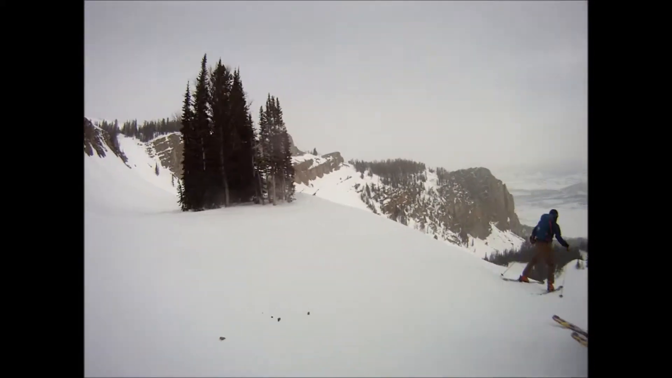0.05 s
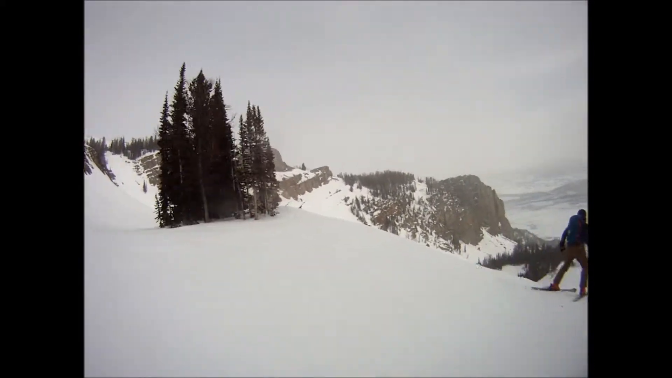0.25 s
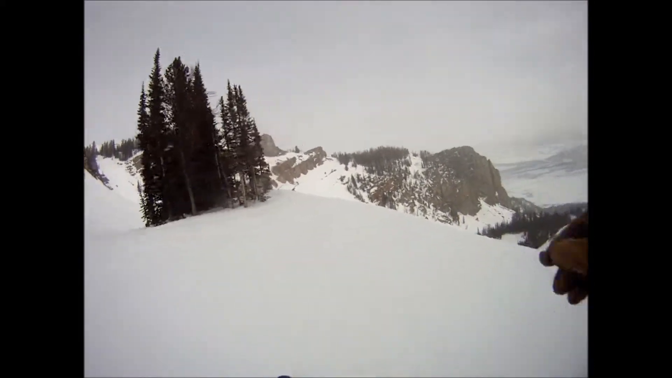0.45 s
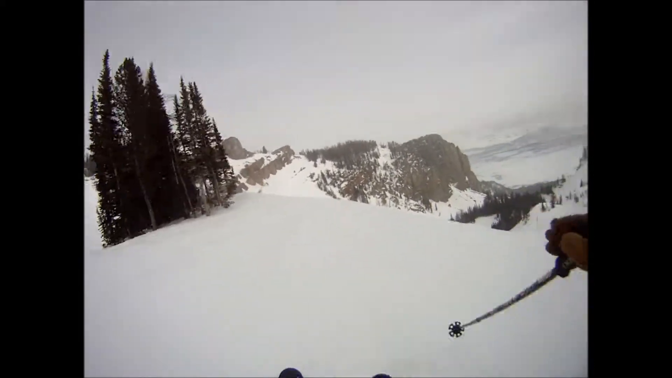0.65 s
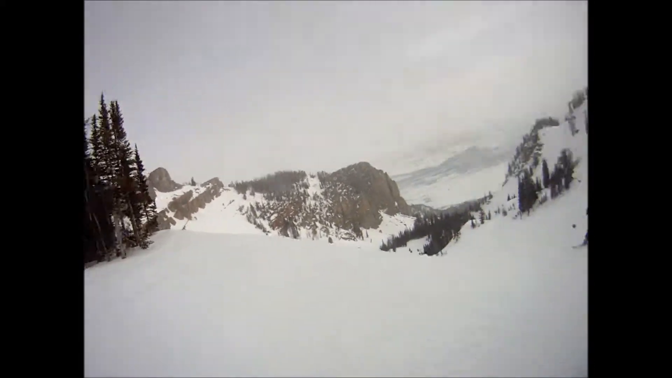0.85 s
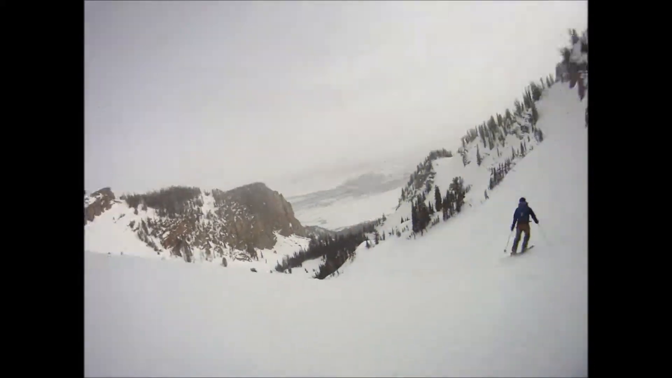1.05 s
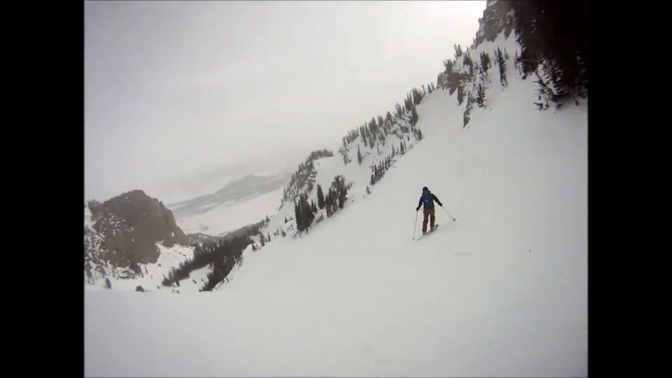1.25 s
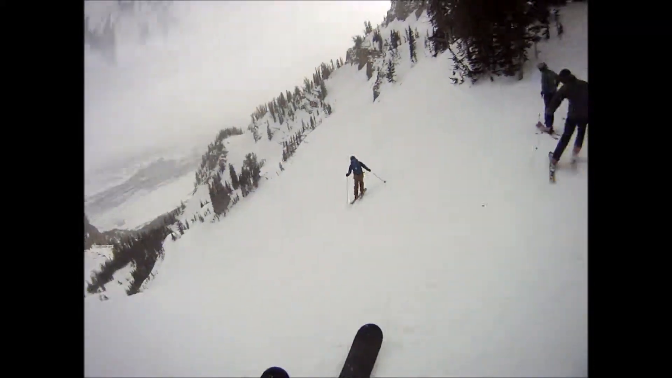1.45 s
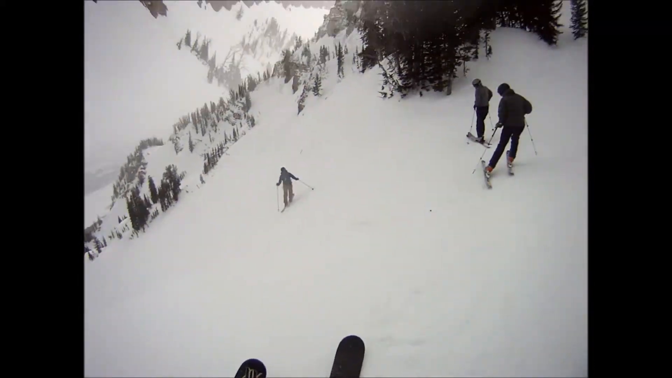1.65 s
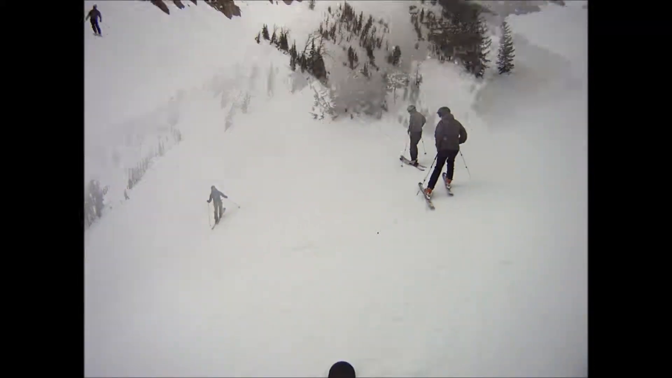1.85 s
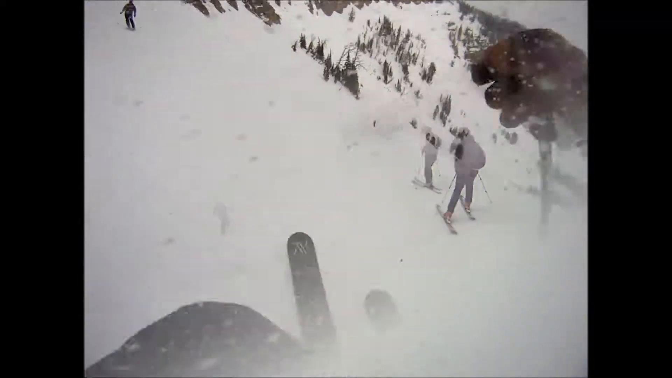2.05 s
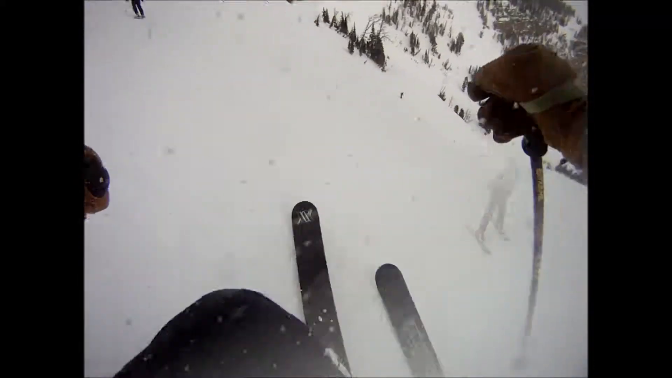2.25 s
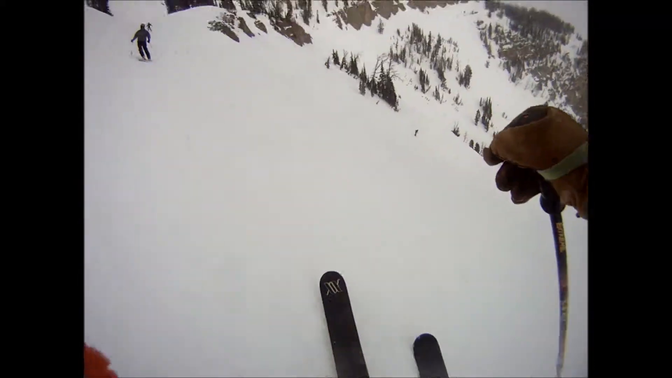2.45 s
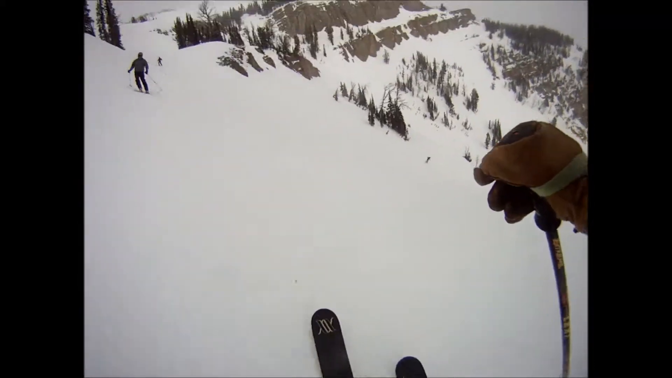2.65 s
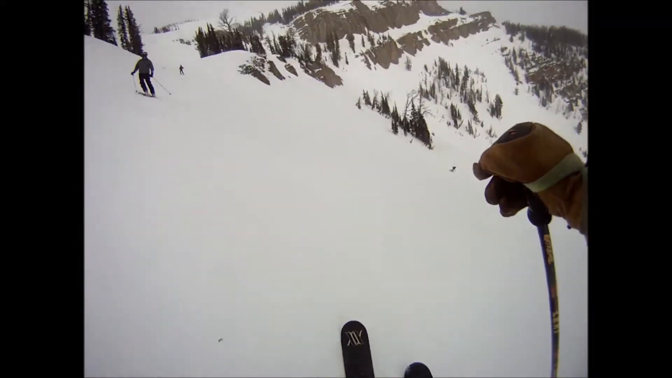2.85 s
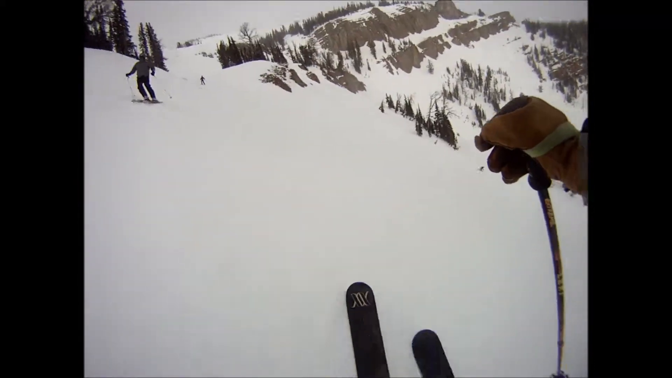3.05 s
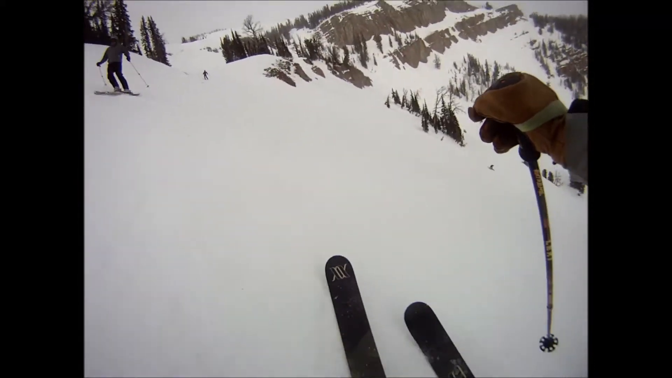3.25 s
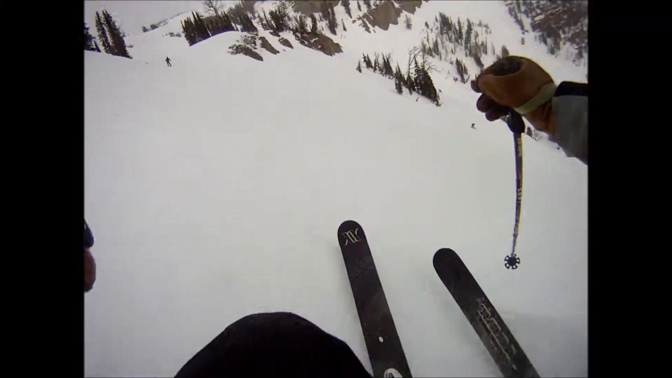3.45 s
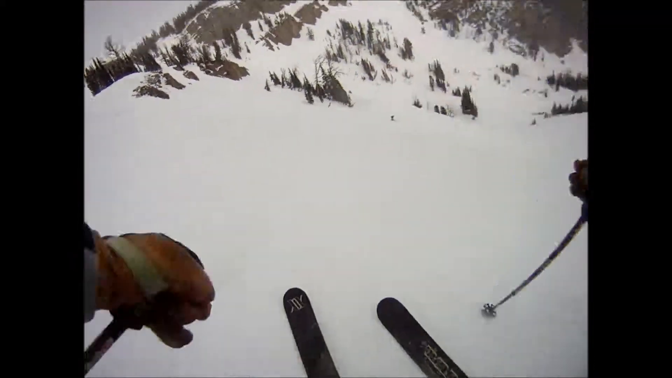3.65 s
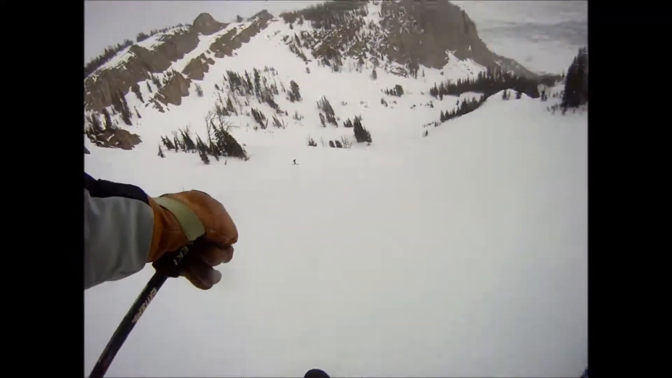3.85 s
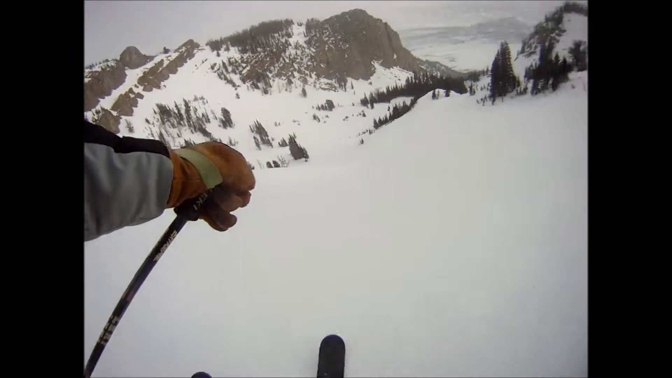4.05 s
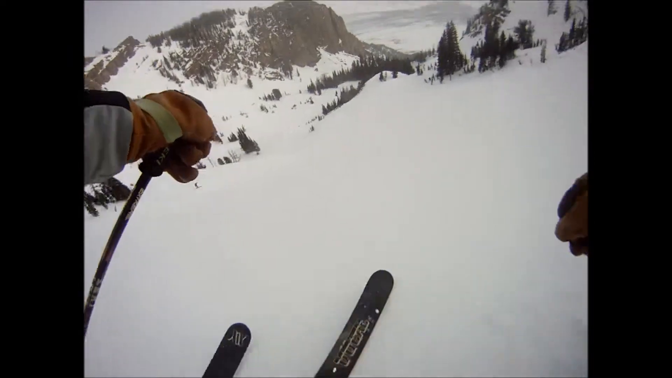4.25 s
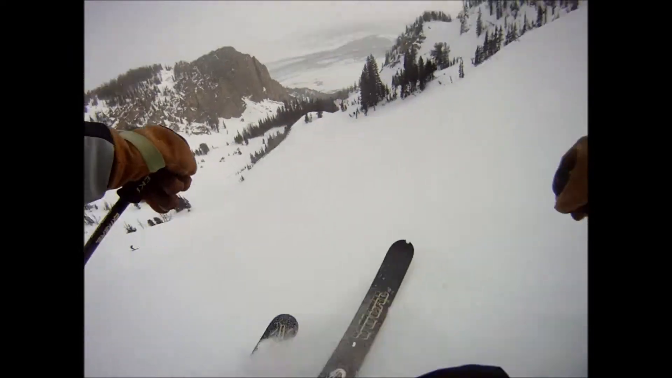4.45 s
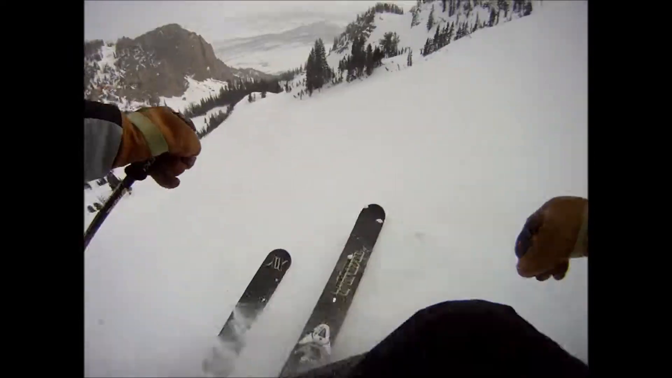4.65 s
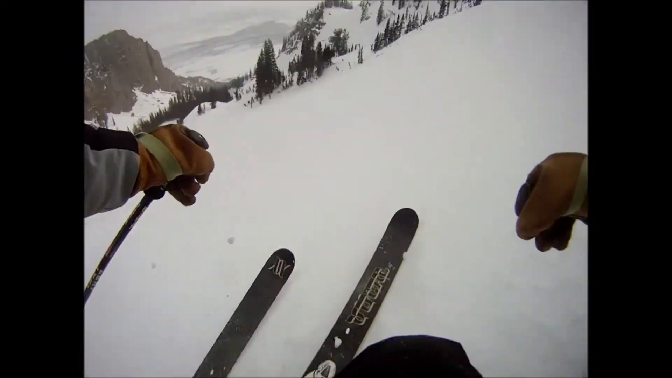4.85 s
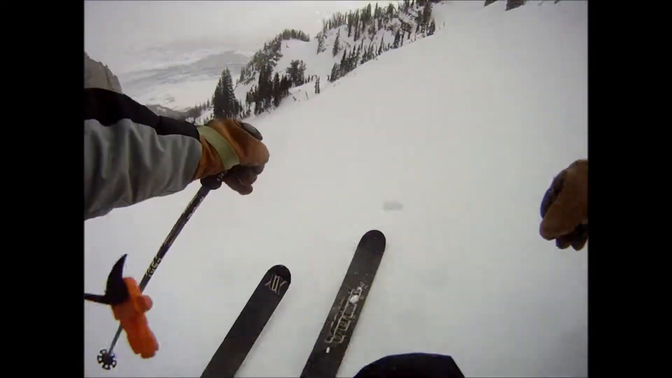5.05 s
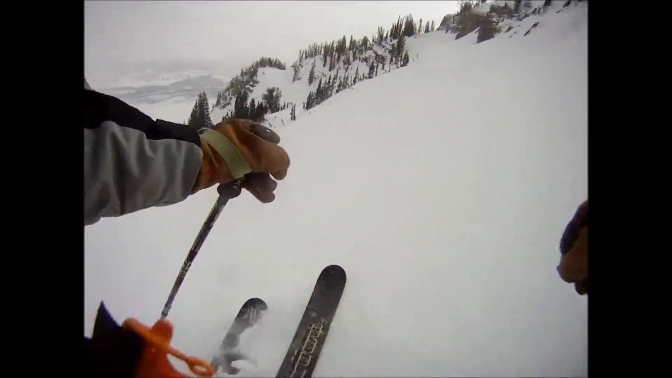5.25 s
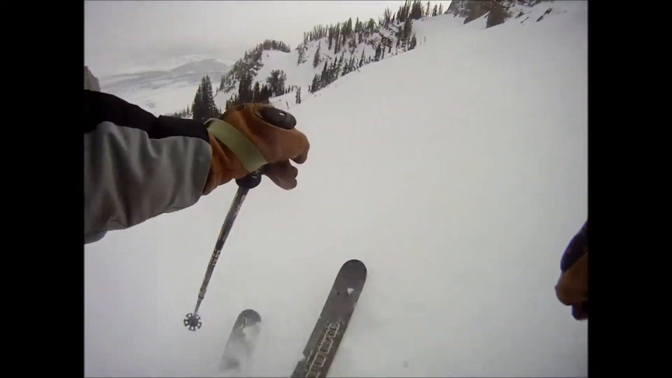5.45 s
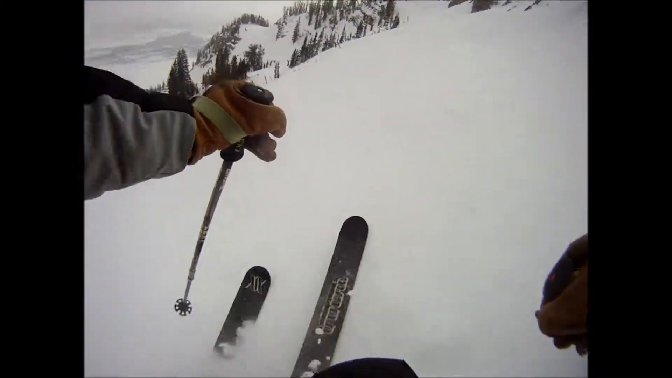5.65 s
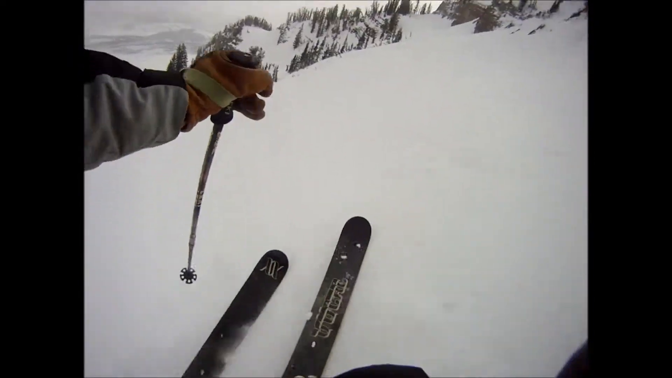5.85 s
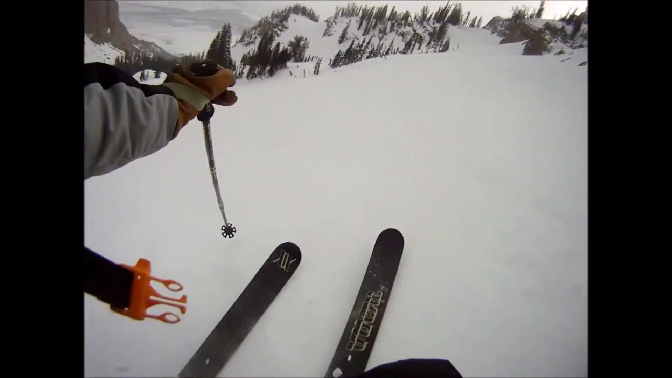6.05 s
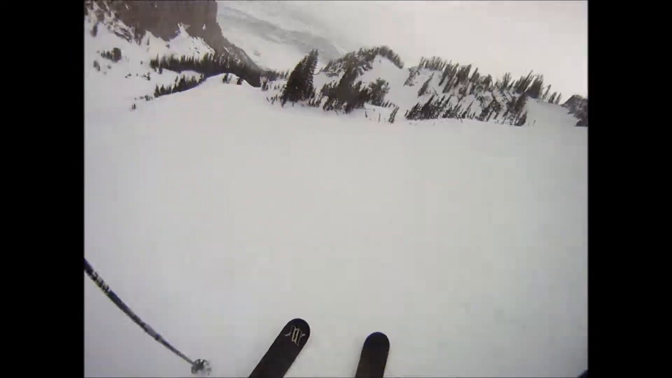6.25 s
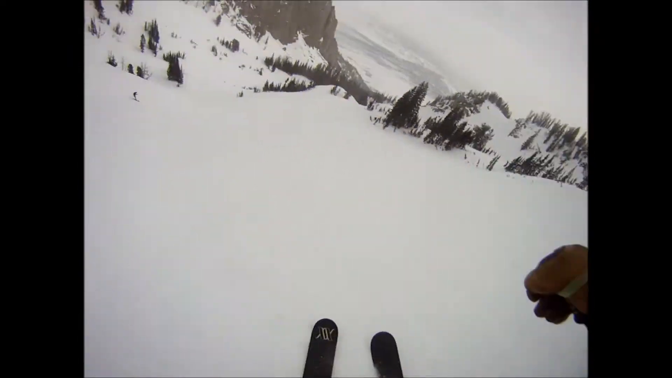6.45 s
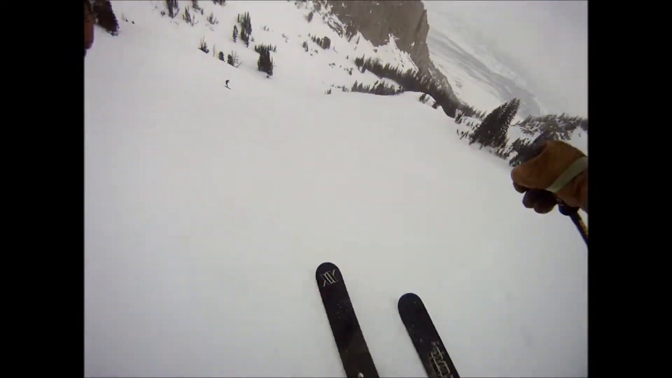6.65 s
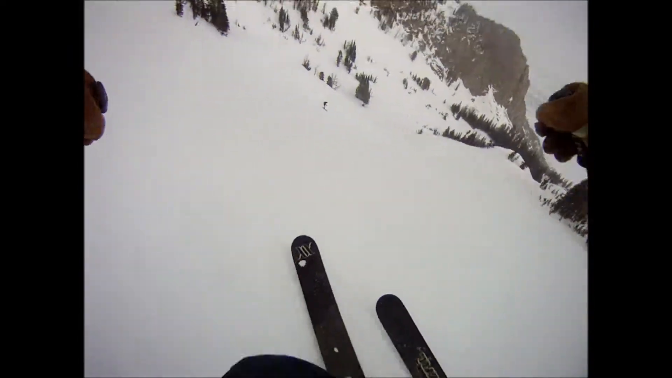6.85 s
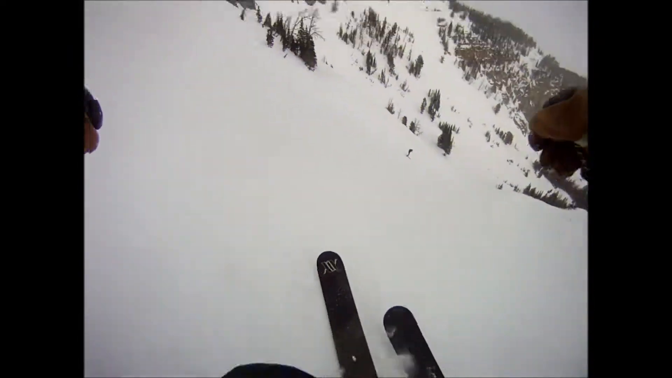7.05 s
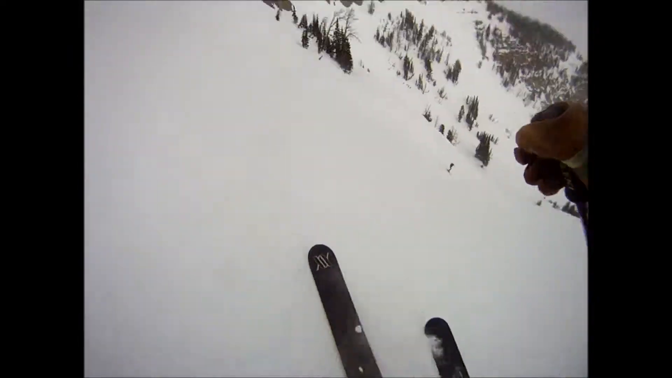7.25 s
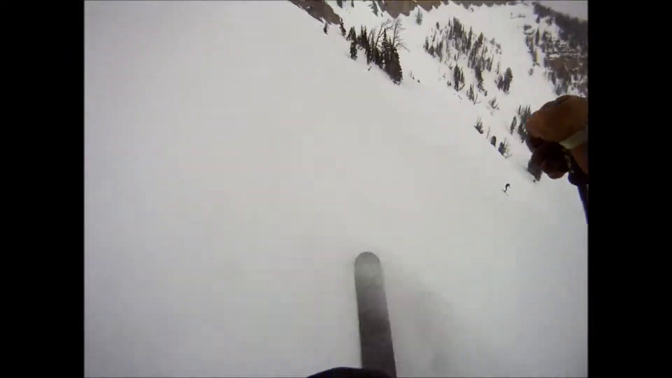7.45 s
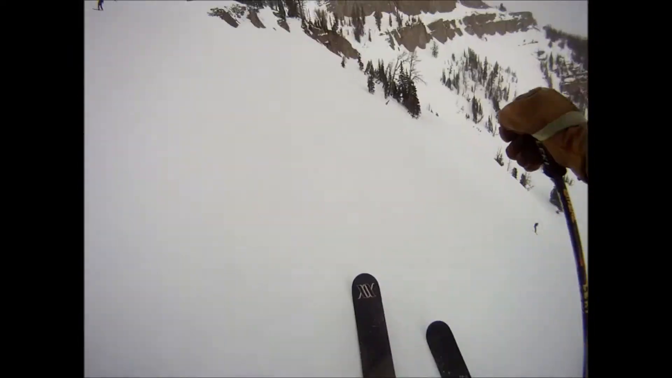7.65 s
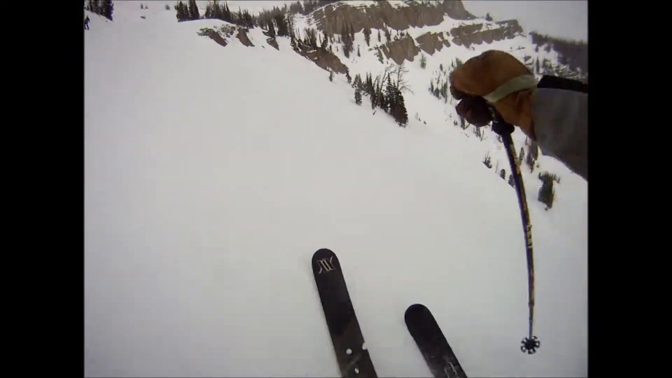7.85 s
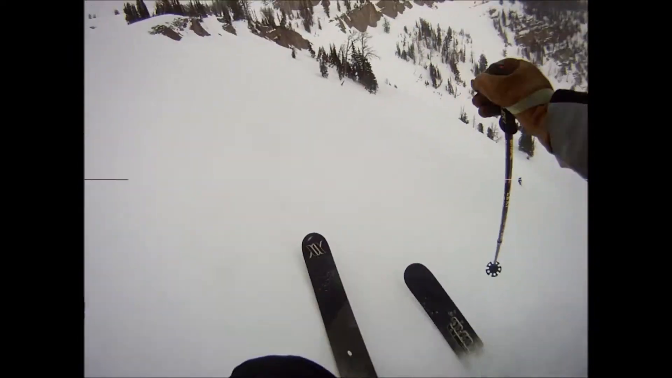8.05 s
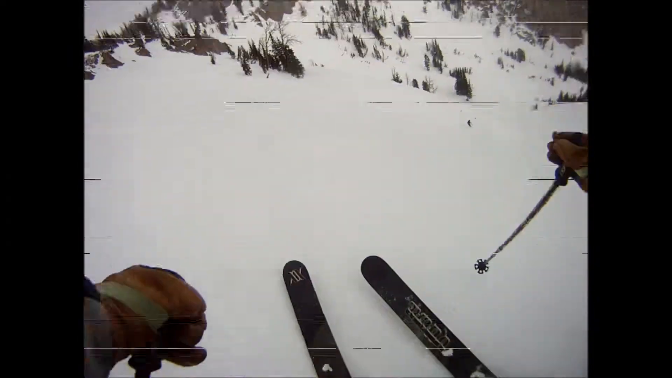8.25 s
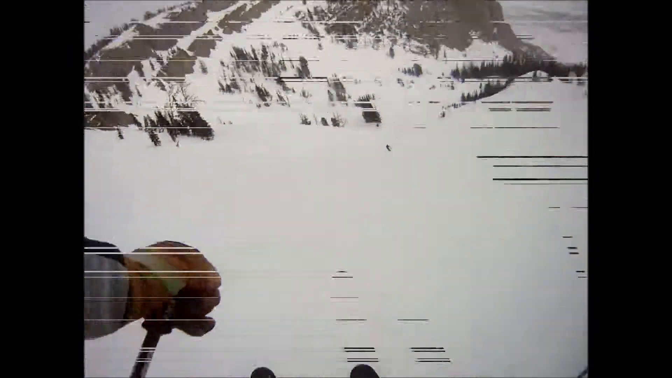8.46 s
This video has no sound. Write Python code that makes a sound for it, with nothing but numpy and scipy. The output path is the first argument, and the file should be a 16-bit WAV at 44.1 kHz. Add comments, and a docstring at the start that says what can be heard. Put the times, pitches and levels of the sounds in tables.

```python
"""Skis hiss through soft snow on a steep slope, swelling on each turn and breaking into crunches.
Snow crystals break under the base and the edges bite through crust. A small camera in a hard shell
rides on the skier: the shell colours the snow, wind buffets it, the mount thumps, gear ticks and
knocks, a strap creaks. The recorder holds each sample of a slow converter, so the sound is mirrored
around that rate. The sound drops out once, briefly."""
import sys
import numpy as np
from scipy import signal
from scipy.fft import rfft, irfft
from scipy.io import wavfile

SR = 44100
rng = np.random.default_rng(int(sys.argv[2]) if len(sys.argv) > 2 else 0)


def dump(signal):
    """Clip the signal to [-1, 1] and save it as 16-bit WAV at the path in sys.argv[1]."""
    limited = np.clip(np.atleast_2d(signal).T, -1, 1)
    pcm = np.round(limited * 32767).astype(np.int16)
    wavfile.write(sys.argv[1], SR, pcm)


N = 375732


# weight on the edges through the turns, as hiss level: time_s, level_db
EDGE_WEIGHT = [(0.0, -40), (0.3, -41), (0.6, -42), (1.05, -46), (1.15, -39.5), (1.45, -34.5), (1.8, -35),
               (2.05, -26), (2.45, -27.5), (2.7, -29.5), (3.2, -36.5), (3.5, -32.5), (3.8, -34),
               (4.05, -46.5), (4.25, -37), (4.5, -31.5), (4.88, -37.5), (4.99, -36), (5.05, -28),
               (5.3, -32.5), (5.55, -36), (6.2, -34.5), (6.42, -47.5), (6.53, -52.5), (6.72, -36.5),
               (6.85, -40), (6.9, -28.5), (7.12, -21.5), (7.3, -36), (7.7, -31.5), (8.52, -37)]
# edge bites through crust: start_s, level_db, length_ms
CRUNCHES = [(0.2, -36, 87), (0.7941, -41, 48), (0.8724, -34, 21), (1.365, -30, 32), (1.535, -24.5, 23),
            (1.8357, -25, 36), (1.915, -22.5, 24), (1.9664, -22, 36), (2.0425, -24.5, 16.5),
            (2.0994, -26, 16), (2.3344, -21.5, 16), (2.384, -23, 6.2), (2.428, -20.5, 20),
            (2.468, -15.5, 35), (2.4894, -32, 33), (2.5112, -29, 30), (2.532, -20.5, 27), (2.8903, -23, 22),
            (3.23, -34.5, 73), (3.365, -30.5, 59), (3.48, -27, 33), (3.55, -28.5, 43), (3.642, -22.5, 33),
            (3.675, -22, 62), (4.28, -26, 32), (4.312, -22, 118), (4.76, -27.5, 45), (5.008, -30, 41),
            (5.0294, -33, 23), (5.0898, -25, 47), (5.1484, -18, 38), (5.198, -21, 28), (5.226, -13, 15),
            (5.24, -20.5, 20), (5.325, -25.5, 102), (5.45, -27.5, 22), (6.0482, -48, 19), (6.7499, -27, 14),
            (6.8603, -25, 15), (6.904, -24.5, 44), (7.028, -23, 41), (7.1094, -37, 14), (7.149, -21, 22),
            (7.4634, -32, 14), (7.7313, -28, 16), (8.2921, -26, 20)]
# upper modes and spray against the shell ring: time_s, level_db
TREBLE_TILT = [(0.0, 2.5), (0.7, 0), (1.25, 0.5), (1.7, -3.5), (2.1, 0), (2.6, 0), (3.1, 2), (3.45, 0.5),
               (3.9, -2), (4.38, 2.5), (4.65, -1.5), (5.05, 0.5), (5.22, -1.5), (5.5, -0.5), (5.8, 0.5),
               (6.2, -2), (6.75, 1), (7.05, -1.5), (7.35, 1.5), (8.52, -1.5)]
# main shell cavity modes: pitch_hz, width_hz, level_db
SHELL_MODES = [(1505, 133, -8.5), (1951, 220, -0.5), (2244, 206, -0.5)]
# upper cavity modes: pitch_hz, width_hz, level_db
UPPER_MODES = [(2765, 194, -3.5), (3224, 263, -1.5), (3510, 133, 1), (4070, 440, -8)]
# fine spray: pitch_hz, width_hz, level_db
SPRAY_BANDS = [(3760, 1300, -15), (4620, 490, 9), (5585, 600, 3)]
# low cavity modes: pitch_hz, width_hz, level_db
BITE_MODES = [(370, 173, -14.5), (681, 132, -8.5), (1078, 136, -0.5)]
UPPER_DB, SPRAY_DB, BITE_DB = -2.5, -13.5, -9   # at mean weight
UPPER_SLOPE, SPRAY_SLOPE, BITE_SLOPE = 0.027, -0.038, -0.34   # dB per dB of weight
LUMPS_DB, COLOUR_WANDER_DB = 0.7, 0.8


def skis():
    """The base rides over lumps and crust, so all bands surge together; more weight thins the low bite."""
    hiss_db = curve(EDGE_WEIGHT)
    glide = from_db(hiss_db + LUMPS_DB * drift(7.3))
    load = np.hypot(glide, bursts(CRUNCHES, rise_share=0.096))
    weight_db = 20 * np.log10(load) - hiss_db.mean()
    flutter = from_db(1.28 * drift(43.0) + 0.75 * drift(70.0))
    snow = crystals(per_s=4000.0, spread_db=2.5, slide_gain=0.99)
    treble_db = curve(TREBLE_TILT)
    upper_db = UPPER_DB + treble_db + UPPER_SLOPE * weight_db + COLOUR_WANDER_DB * drift(3.5)
    spray_db = SPRAY_DB + treble_db + SPRAY_SLOPE * weight_db + COLOUR_WANDER_DB * drift(5.0)
    bite_db = BITE_DB + BITE_SLOPE * weight_db + COLOUR_WANDER_DB * drift(3.6)
    upper = from_db(upper_db) * resonances(snow, UPPER_MODES, flicker_db=1.9)
    spray = from_db(spray_db) * resonances(snow, SPRAY_BANDS, flicker_db=3.5)
    bite = from_db(bite_db) * resonances(snow, BITE_MODES, flicker_db=3.0)
    shell = resonances(snow, SHELL_MODES, flicker_db=1.68)
    return load * flutter * (shell - upper - spray - bite)


def crystals(per_s, spread_db, slide_gain):
    """Snow crystals break at random with uneven size, over smooth sliding noise."""
    sizes = from_db(spread_db * np.minimum(rng.exponential(1, N), 5))
    signs = rng.choice([-1, 1], N)
    breaks = rng.random(N) < per_s / SR
    return rms_one(sizes * signs * breaks) + slide_gain * rng.standard_normal(N)


# steady buffeting on the shell: time_s, level_db
WIND_LEVEL = [(0.0, -51), (0.9, -50), (1.3, -39.5), (1.75, -43), (2.1, -34.5), (2.5, -43), (3.0, -49.5),
              (3.6, -46.5), (4.4, -43), (4.75, -45), (5.0, -42.5), (5.5, -45.5), (6.15, -52.5),
              (6.5, -45.5), (7.1, -43), (7.6, -42.5), (8.52, -38.5)]
# gusts: start_s, level_db, length_ms
GUSTS = [(0.26, -43, 150), (1.36, -34.5, 170), (1.85, -20.5, 97), (2.07, -34, 120), (2.22, -32.5, 164),
         (3.59, -39, 150), (4.61, -23, 74), (4.7, -34, 170), (5.05, -27.5, 136), (5.28, -33.5, 145),
         (6.34, -38, 50), (7.22, -26.5, 90), (7.43, -31.5, 130), (7.62, -32.5, 91), (7.88, -33.5, 86),
         (8.07, -47, 89), (8.26, -32, 66)]
# buffeting spectrum: frequency_hz, density_db
WIND_SPECTRUM = [(8.8, -25), (15, 8.5), (97, -5.5), (146, -3), (262, -18), (327, -13.5), (432, -25),
                 (500, -20.5), (650, -30), (1100, -120)]


def wind():
    """Low, lumpy pressure noise at the microphone port, steady with gusts on top."""
    hz, density_db = np.transpose(WIND_SPECTRUM)
    bins_hz = np.fft.rfftfreq(N, 1 / SR)
    shape = from_db(np.interp(np.log(bins_hz + 1), np.log(hz), density_db))
    rumble = rms_one(irfft(rfft(rng.standard_normal(N)) * shape, N))
    lumps = from_db(2.5 * drift(30.0))
    strength = np.hypot(from_db(curve(WIND_LEVEL)), bursts(GUSTS, rise_share=0.14))
    return strength * lumps * rumble


# body jolts through the mount: start_s, level_db, pitch_hz
JOLTS = [(1.848, -20, 140), (1.877, -1, 172), (1.896, -15.5, 105), (1.912, -7.5, 70.5), (2.251, -15, 171),
         (2.269, -13.5, 128), (2.41, -25, 134), (4.62, -7.5, 176), (4.637, -21, 115), (4.683, -14, 103),
         (4.724, -20, 74), (4.819, -26, 146), (4.856, -27, 72.7), (5.118, -32, 119), (5.327, -21.5, 86),
         (7.24, -12, 134), (7.267, -13.5, 123), (7.279, -9.5, 133), (7.319, -25.5, 72.7), (7.449, -25, 141),
         (7.499, -20.5, 137), (8.099, -22.5, 124), (8.298, -16.5, 98), (8.333, -14, 174)]
# mount shudder: pitch_hz, width_hz, level_db
MOUNT_MODES = [(270, 140, 0), (400, 120, -4), (700, 300, -4)]
JOLT_RISE_S, JOLT_DECAY_CYCLES, SHUDDER_DB = 0.00079, 1, -10.5


def mount_thumps():
    """The mount swings back, then forward, and settles in a few cycles with a rough shudder."""
    span = 4000
    t = np.arange(span) / SR
    swing, shake = np.zeros((2, N + span))
    for start_s, level_db, hz in JOLTS:
        fade = from_db(level_db) * (1 - np.exp(-t / JOLT_RISE_S)) * np.exp(-t * hz / JOLT_DECAY_CYCLES)
        swing[round(start_s * SR):][:span] -= np.sin(2 * np.pi * hz * t) * fade
        shake[round(start_s * SR):][:span] += from_db(SHUDDER_DB) * fade
    shudder = resonances(rng.standard_normal(N), MOUNT_MODES, flicker_db=1.5)
    return swing[:N] + shake[:N] * shudder


# gear contacts, hardness as pitch above the shell ring: start_s, level_db, hardness_oct
CONTACTS = [(0.4923, -25.5, 0.93), (0.5734, -14, 0.42), (0.5802, -14.5, 0.0), (0.658, -22, 0.52),
            (1.0809, -23.5, 0.25), (1.138, -21.5, 1), (1.38, -16, -0.36), (1.5424, -17.5, 1.25),
            (1.549, -17, 1.2), (1.702, -20, 0.0), (1.7658, -26, -0.0054), (1.878, -3, -0.68),
            (1.898, -25, -1.05), (1.9161, -11, 0.27), (2.2599, -17, -0.78), (2.8984, -11, 1.54),
            (2.9044, -9, 1.77), (3.321, -22.5, 1.1), (3.3732, -16.5, -0.57), (3.422, -14, 0.23),
            (3.4937, -19, 0.25), (3.9447, -23, 0.0), (4.098, -22.5, -0.76), (4.111, -30, -0.8),
            (4.1372, -25.5, 1.2), (4.623, -4, -0.5), (4.6838, -27, -1.4), (4.7474, -18, 1.2),
            (5.043, -18.5, -1.0), (6.0306, -8, -0.53), (6.1046, -4.5, -0.5), (6.4594, -26.5, 0.63),
            (6.507, -28, 0.37), (6.75, -13, 1.52), (6.7568, -15, 0.4), (7.27, -18, 1.5), (7.28, -20, -1.0),
            (7.4113, -13, 0.66), (7.4138, -18, 0.58), (8.013, -17, -0.59), (8.153, -17.5, 1.05),
            (8.2224, -25.5, 1.35), (8.297, -15.5, 0.0), (8.333, -25, -1.0), (8.3804, -14, 1.08),
            (8.505, -21, 0.96)]
# modes a contact strikes, shell ring first: pitch_hz, ring_s
TICK_MODES = [(2043, 0.016), (994, 0.0059), (3380, 0.0047), (4790, 0.0081)]
RATTLE_S, RATTLE_GROWTH_PER_OCT, FALL_DB_PER_OCT2 = 0.0024, 1.26, 32.5


def gear_ticks():
    """A sharp contact and its rattle, longer when harder; modes far from its hardness ring less."""
    span = 900
    out = np.zeros(N + span)
    shell_hz = TICK_MODES[0][0]
    rattle_s = RATTLE_S * RATTLE_GROWTH_PER_OCT ** np.array(CONTACTS)[:, 2:]
    force = 0.31 * rng.standard_normal((len(CONTACTS), span)) * np.exp(-np.arange(span) / SR / rattle_s)
    force[:, 0] = 1   # first impact
    for hz, ring_s in TICK_MODES:
        for (start_s, level_db, hardness_oct), tick in zip(CONTACTS, ring(force, hz, ring_s)):
            away_oct = np.log2(hz / shell_hz) - hardness_oct
            peak = from_db(level_db - FALL_DB_PER_OCT2 * away_oct ** 2)
            out[round(start_s * SR):][:span] += peak * tick / np.abs(tick).max()
    return out[:N]


# strap slips: start_s, level_db
SLIPS = [(0.731, -47), (0.742, -39), (0.75, -32), (0.762, -34), (0.776, -29.5), (0.794, -34), (5.366, -26),
         (5.376, -31), (5.383, -23), (5.39, -20), (5.397, -23), (5.409, -18.5)]


def strap_creaks():
    """The strap creaks in separate slips, each one click into two low modes of the shell."""
    clicks = np.full(N, 1e-18)
    for start_s, level_db in SLIPS:
        clicks[round(start_s * SR)] = from_db(level_db)
    low = from_db(5.5) * ring(clicks, hz=940, ring_s=0.0058)
    high = from_db(0.5) * ring(clicks, hz=1820, ring_s=0.017)
    return low + high


def resonances(x, modes, flicker_db):
    """Parallel resonances of alternating sign, each flickering on its own; rms 1."""
    out = 0
    for k, (hz, width_hz, level_db) in enumerate(modes):
        r, w = np.exp(-np.pi * width_hz / SR), 2 * np.pi * hz / SR
        gain = (1 - r * r) / 2
        band = signal.lfilter([gain, 0, -gain], [1, -2 * r * np.cos(w), r * r], x)
        out = out + (-1) ** k * from_db(level_db + flicker_db * drift(17.0)) * band
    return rms_one(out)


def ring(force, hz, ring_s):
    """One mode applied twice, so a click rings in its own band only."""
    r, w = from_db(-60 / (ring_s / 2 * SR)), 2 * np.pi * hz / SR
    section = [1 - r, 0, r - 1, 1, -2 * r * np.cos(w), r * r]
    return signal.sosfilt([section, section], force) / (1 - r)


def bursts(rows, rise_share):
    """Amplitude envelope: each burst swells over a share of its length, holds and breaks off."""
    span = SR // 2
    out, t_ms = np.zeros(N + span), np.arange(span) * 1000 / SR
    for start_s, level_db, length_ms in rows:
        age = t_ms / length_ms
        shape = (1 - np.exp(-age / rise_share)) * np.exp(-age ** 3)
        out[round(start_s * SR):][:span] += from_db(level_db) * shape
    return out[:N]


def drift(rate_hz):
    """Smooth random wander below about rate_hz; rms 1."""
    step, warm_up = 20, 2000
    r = np.exp(-2 * np.pi * rate_hz * step / SR)
    noise = rng.standard_normal(N // step + warm_up + 2)
    slow = signal.lfilter([1], [1, -2 * r, r * r], noise)[warm_up:]
    return np.interp(np.arange(N) / step, np.arange(len(slow)), rms_one(slow))


def curve(rows):
    """Breakpoints interpolated to every sample."""
    time_s, values = np.transpose(rows)
    return np.interp(np.arange(N) / SR, time_s, values)


def from_db(db):
    """Gain of a level in dB."""
    return 10 ** (np.asarray(db) / 20)


def rms_one(x):
    """Scaled to rms 1."""
    return x / np.sqrt(np.mean(x ** 2) + 1e-20)


def scene():
    """Skis, wind and gear at one microphone."""
    return (skis() + wind() + gear_ticks() + strap_creaks() + mount_thumps())[None]


HOLD_HZ, CUTOFF_HZ = 12000, 15280
GAP_START_S, GAP_END_S = 1.3265, 1.3595


def record(dry):
    """Peaks round off; sample-and-hold mirrors the sound under a sinc droop; a short gap; a top cut."""
    t = np.arange(N) / SR
    rounded = 0.78 * np.tanh(dry / 0.83)
    anti_alias = signal.cheby1(4, 1, 0.482 * HOLD_HZ, fs=SR, output="sos")
    mirrored = signal.sosfilt(anti_alias, rounded) * (1 + 2 * np.cos(2 * np.pi * HOLD_HZ * t))
    droop = np.sinc(np.fft.rfftfreq(N, 1 / SR) / HOLD_HZ)
    held = irfft(rfft(mirrored) * droop, N)
    outside_gap = (t < GAP_START_S) | (t > GAP_END_S)
    top_cut = signal.ellip(12, 0.5, 50, CUTOFF_HZ, fs=SR, output="sos")
    return signal.sosfilt(top_cut, held * outside_gap)


dry = scene()
out = record(dry)
dump(out)
```